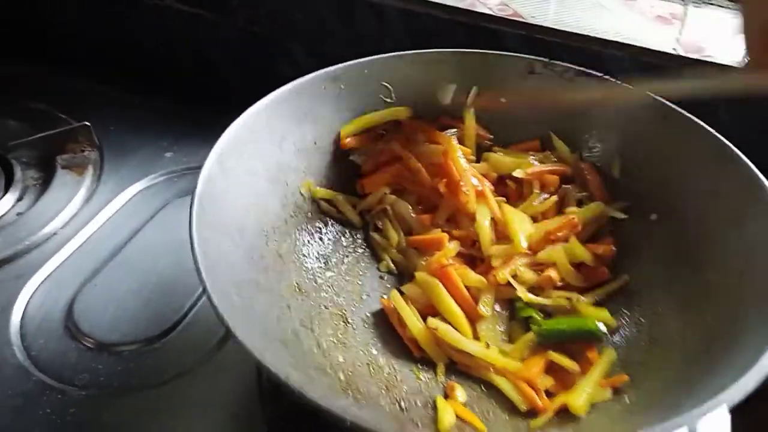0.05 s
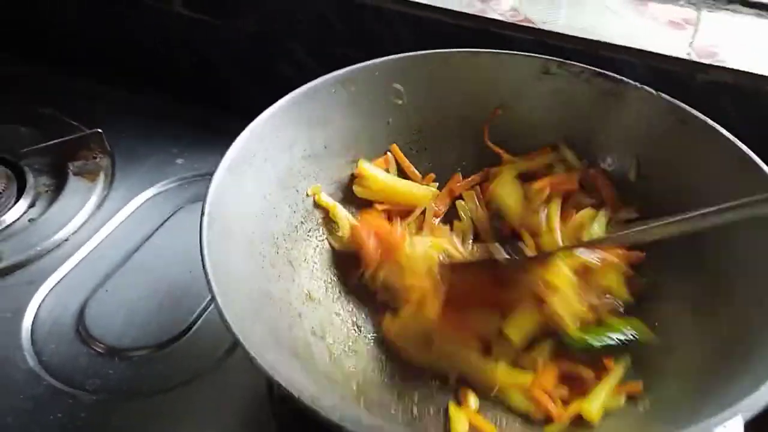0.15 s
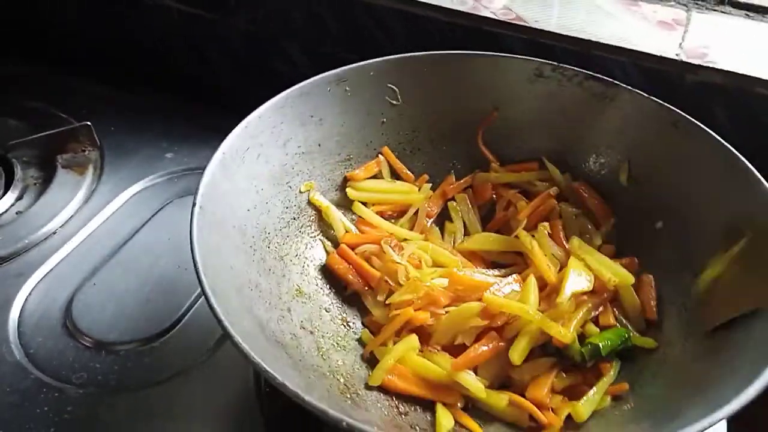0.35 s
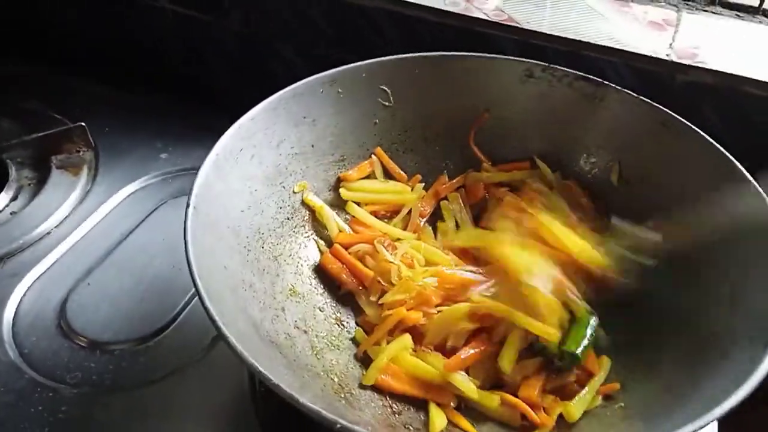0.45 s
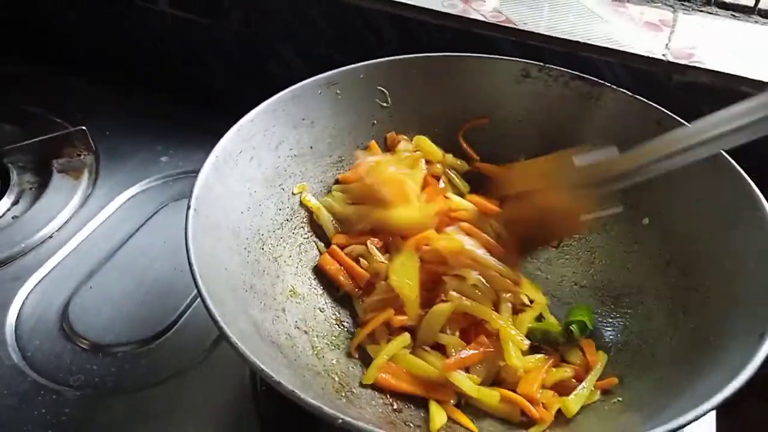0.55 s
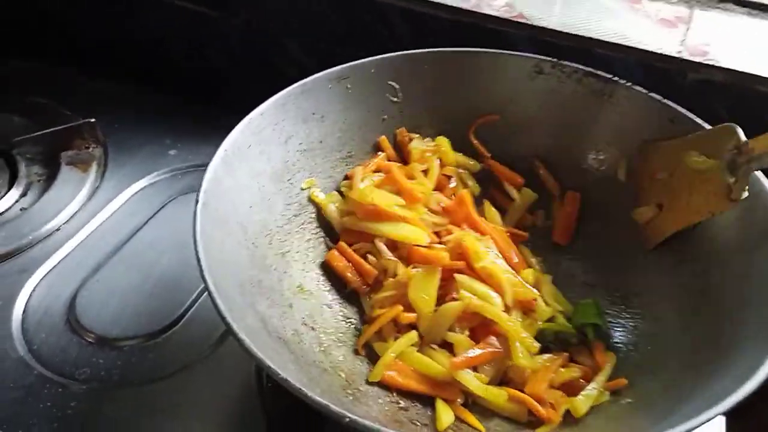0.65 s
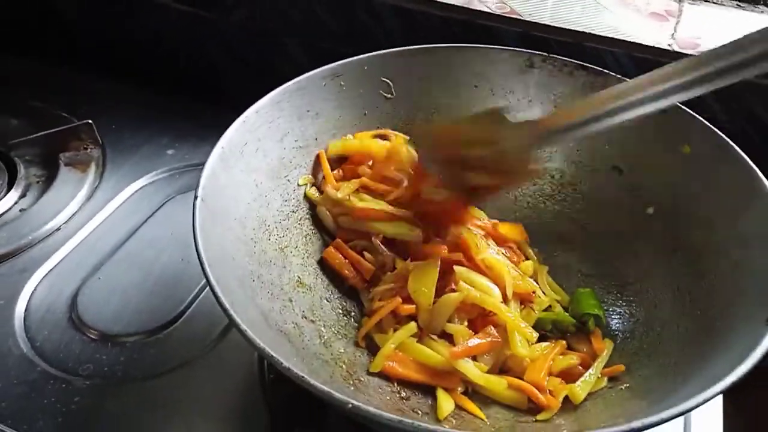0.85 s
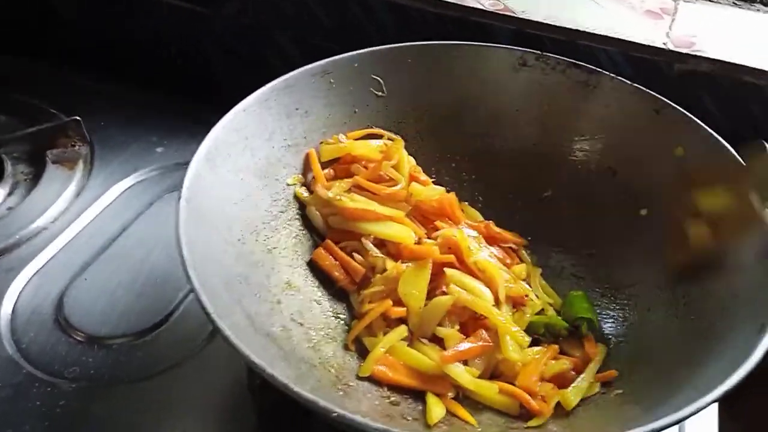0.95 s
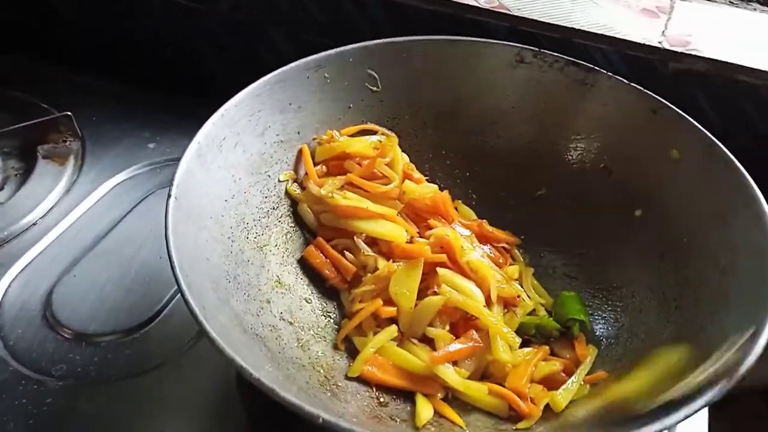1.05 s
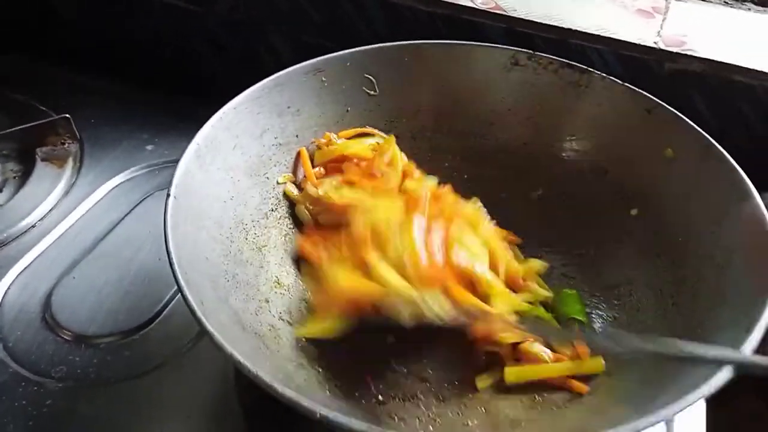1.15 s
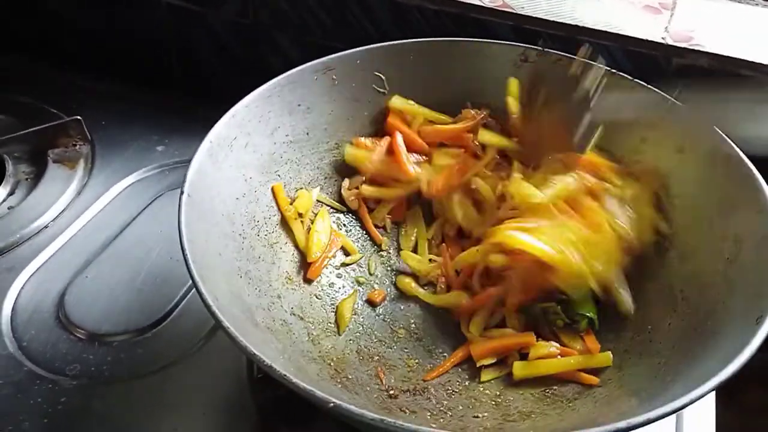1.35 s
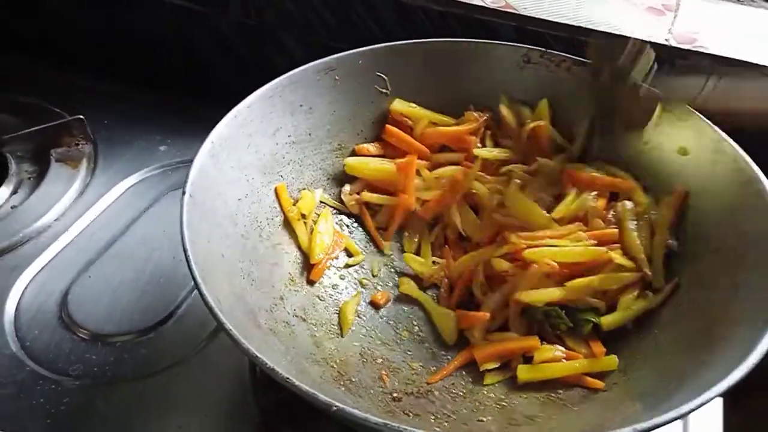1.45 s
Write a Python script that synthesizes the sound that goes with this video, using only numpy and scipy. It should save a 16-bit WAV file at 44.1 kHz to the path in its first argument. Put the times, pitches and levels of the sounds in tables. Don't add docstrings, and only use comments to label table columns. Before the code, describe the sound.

A metal spatula scrapes and knocks in a steel wok of vegetables over a faint sizzle.

```python
import sys
import numpy as np
from scipy import signal
from scipy.fft import rfft, irfft, next_fast_len
from scipy.io import wavfile
from scipy.ndimage import uniform_filter1d, map_coordinates

SR = 44100
rng = np.random.default_rng(int(sys.argv[2]) if len(sys.argv) > 2 else 0)


def attenuation_scalar(level_db):
    decades = np.asarray(level_db, float) / 20
    return 10 ** decades


def int16_out(signal):
    q = np.round(np.clip(np.atleast_2d(signal).T, -1, 1) * 32767)
    wavfile.write(sys.argv[1], SR, q.astype(np.int16))


N = 66150
TIME = np.arange(N) / SR


def unit(x):
    return x / np.sqrt(np.mean(x ** 2) + 1e-20)


def along(points, hz):
    f, v = np.transpose(points)
    return np.interp(np.log(hz + 1), np.log(f + 1), v)


def wobble(rate):
    knots = rng.standard_normal(int(N * rate / SR) + 4)
    return map_coordinates(knots, [np.arange(N) * rate / SR])


def filtered(x, response):
    m = next_fast_len(N + SR // 2)
    return irfft(rfft(x, m) * response(np.fft.rfftfreq(m, 1 / SR)), m)[..., :N]


def coloured(x, spectrum):
    return unit(filtered(x, lambda hz: attenuation_scalar(along(spectrum, hz))))


def resonances(table):
    def response(f):
        total = 0
        for k, (centre, width, db) in enumerate(table):
            damping = 1j * f * width
            total = total + (-1) ** k * attenuation_scalar(db) * damping / (centre ** 2 - f ** 2 + damping)
        return total
    return response


def modes(table, longest=.5):
    def response(f):
        total = 0
        for k, (centre, db, t60) in enumerate(table):
            width = np.log(1000) / np.pi / np.clip(t60, .005, longest)
            gain = (-1) ** k * attenuation_scalar(db) * SR / np.pi
            total = total + gain * 1j * f / (centre ** 2 - f ** 2 + 1j * f * width)
        return total
    return response


def slips():
    return unit(rng.standard_normal(N) * attenuation_scalar(2.5 * wobble(900) + wobble(60.2)))


def swell(s, length):
    u = np.clip((TIME - s) / length, 0, 1)
    return np.abs(np.sin(np.pi * u ** .55)) ** .8


# frequency [Hz], level [dB per Hz].
AIR_SPECTRUM = [(15, -53), (25, -14), (140, -1), (220, 0.5), (482, -1.5), (1020, -9), (1100, -9),
                (2200, -12), (2860, -17), (4840, -120)]


def kitchen_air():
    return attenuation_scalar(-62) * coloured(rng.standard_normal(N), AIR_SPECTRUM) * attenuation_scalar(1.5 * wobble(11.65))


# frequency [Hz], level [dB per Hz].
SIZZLE_SPECTRUM = [(1200, -18), (2700, -3), (4450, -11.5), (6800, -0.5), (7700, -5), (8800, -7.5),
                   (12500, -15.5), (14000, -18.5), (15100, -9)]


def sizzle():
    spits_per_s, spit_db, level_db = 500, -9, -56.5
    spit_level = attenuation_scalar(4 * np.minimum(rng.exponential(size=N), 2))
    spits = (rng.random(N) < spits_per_s / SR) * rng.standard_normal(N) * spit_level
    steam = rng.standard_normal(N) * attenuation_scalar(2.1 * wobble(40.05))
    fry = steam + attenuation_scalar(spit_db) * unit(spits)
    return attenuation_scalar(level_db + wobble(5.23)) * coloured(fry, SIZZLE_SPECTRUM)


# frequency [Hz], t60 [s].
ROOM_DECAY = [(200, .25), (2000, .2), (10000, .12)]


def room(x):
    hz, t, z = signal.stft(rng.standard_normal(SR // 2), SR, nperseg=256)
    decay = attenuation_scalar(-60 * t / along(ROOM_DECAY, hz)[:, None])
    tail = signal.istft(z * decay, SR, nperseg=256)[1]
    delayed = np.pad(x, (200, 0))
    return signal.fftconvolve(delayed, tail / np.linalg.norm(tail))[:N]


# start [s], length [s], pitch [Hz], level [dB], glide [Hz].
SQUEAK_EVENTS = [(0.098, 0.02, 857, -56, -2), (0.119, 0.071, 991, -63, 57.5),
                 (0.135, 0.039, 1750, -64.5, 40.5), (0.105, 0.025, 185, -53.5, 19),
                 (0.136, .025, 230, -58, 1.5), (0.405, 0.065, 840.5, -44.5, -19.5),
                 (0.419, 0.04, 1105, -46, -0.5), (0.447, 0.052, 1127, -49, 30.5),
                 (0.463, 0.018, 1359, -52, 1.5), (1.115, 0.062, 4264, -55, -4),
                 (0.545, 0.059, 800, -55.5, -31), (0.617, 0.086, 1996, -65.5, -0.5),
                 (0.801, 0.029, 4420, -57, 4.5), (0.804, 0.017, 2663, -55.5, 0.5),
                 (1.211, 0.015, 1800, -48, 5), (1.25, 0.16, 2015, -69, -2)]


def squeaks():
    flutter_db, jitter_hz = 2.5, 15
    out = np.zeros(N)
    for s, length, hz, db, glide in SQUEAK_EVENTS:
        level = attenuation_scalar(db + flutter_db * wobble(90)) * swell(s, length) * np.sqrt(2)
        progress = np.clip((TIME - s) / length - .5, -.5, .5)
        pitch = hz + glide * progress + jitter_hz * wobble(120)
        out += level * np.sin(2 * np.pi * np.cumsum(pitch) / SR)
    return out


# start [s], length [s], level [dB], centre [Hz].
SURGE_EVENTS = [(.216, .014, -36, 6600), (.23, .024, -42, 6800), (.281, .018, -39, 5300),
                (.298, .032, -41, 6000), (.338, .015, -39, 6200), (.359, .01, -43, 6900),
                (.212, .016, -38, 2620), (.285, .014, -43, 2620), (.251, .015, -36, 1800),
                (.361, .012, -43, 2800), (1.232, .05, -51, 1900), (1.068, .03, -52, 7000),
                (.848, .055, -55, 600), (1.005, .035, -48, 2600), (1.097, .035, -48, 2200),
                (.29, .04, -47, 155), (.21, .05, -42, 780)]


def surges():
    out = np.zeros(N)
    for s, length, db, centre in SURGE_EVENTS:
        band = lambda f: np.exp(-(np.log(f / centre + 1e-9) / .2) ** 2)
        out += attenuation_scalar(db) * swell(s, length) * unit(filtered(slips(), band))
    return out


# start [s], level [dB], softness [s].
KNOCK_EVENTS = [(.098, -51.5, 0.00052), (0.392, -48, 0.001), (0.404, -39, 0.00055), (1.05, -48, 0.00068),
                (0.2113, -25, 0.00047), (.252, -26.5, 0.00047), (0.257, -26.5, 0.00046),
                (0.278, -41, 0.00044), (0.305, -47, 0.00043), (0.325, -43.5, 0.00024), (.355, -35, 0.00038),
                (0.851, -38.5, 0.0006), (1.152, -34, 0.00052), (1.2345, -31, 0.00045),
                (1.266, -37, 0.00048), (1.005, -36.5, 0.001)]
# frequency [Hz], level [dB], t60 [s].
BOWL_MODES = [(230, -20.5, 0.055), (294.6, -3.5, 0.078), (342.5, -4, 0.055), (505, -8.5, 0.035),
              (612, -12, 0.084), (751, -5.5, 0.047), (1000, -16, 0.032), (1740, -10, 0.03)]


def knocks():
    push, t = np.zeros(N + SR), np.arange(SR // 50) / SR
    for s, db, soft in KNOCK_EVENTS:
        u = t / soft
        rough = 1 + .6 * rng.standard_normal(len(t))
        push[round(s * SR):][:len(t)] += attenuation_scalar(db) * u * np.exp(-u) / (soft * SR) * rough
    return filtered(push[:N], modes(BOWL_MODES))


# start [s], level [dB], click pitch [Hz], click t60 [s], ring level re click [dB].
TAP_EVENTS = [
    (0.69, -29.5, 3080, 0.015, -19),
    (1.001, -25.5, 3160, 0.025, -47),
    (1.1, -38, 11000, 0.0021, -38),
    (1.014, -52, 2876, 0.028, -38),
    (1.477, -39, 3000, 0.0054, -25),
    (0.52, -45, 3550, 0.045, -12),
    (1.1065, -36, 2100, 0.0083, -41),
    (1.117, -37, 7700, 0.004, -13.5),
]
# frequency [Hz], level [dB], t60 [s].
SPATULA_MODES = [(1437, -12, .4), (2020, -22, .5), (2686, -9, .45), (3429, -5, .18), (4264, -15, .3),
                 (7130, -9, .12)]


def taps():
    out, blows, t = np.zeros(N + SR), np.zeros(N), np.arange(SR // 5) / SR
    onset = 1 - np.exp(-t / 0.00028)
    for s, db, hz, t60, ring_db in TAP_EVENTS:
        start = round(s * SR)
        out[start:][:len(t)] += attenuation_scalar(db - 60 * t / t60) * onset * np.sin(2 * np.pi * hz * t)
        blows[start] = attenuation_scalar(db + ring_db)
    return out[:N] + filtered(blows, modes(SPATULA_MODES))


# start [s], rise [s], hold [s], fall t60 [s], level [dB].
SKID_EVENTS = [
    (.412, 0.0028, 0.0055, 0.12, -35.5),
    (0.798, 0.015, 0.0029, 0.13, -43),
    (0.9989, 0.0011, 0.00075, 0.1, -38.5),
    (1.093, 0.0038, 0.02, 0.22, -41.5),
]
# frequency [Hz], level [dB], t60 [s].
SKID_SPOTS = [
    [(4264, -15, .08), (5350, -12, .06), (6148, 0, .06), (7077, -3, .08), (8931, -9, .07), (9500, -11, .05),
     (9805, -5, .045), (14700, -10, .025)],
    [(5250, -6, .04), (5440, -4, .07), (6395, 0, .06), (6880, 0, .04), (7650, -6, .04), (8753, -5, .04),
     (9685, -10, .03)],
    [(4840, -6, .04), (5740, -3, .03), (5943, -4, .05), (6890, -5, .04), (7600, -5, .04), (8931, -1, .04),
     (9577, -2, .04), (10300, -8, .03), (12820, -12, .04), (14640, -7, .02)],
    [(1540, -14, .04), (2150, -8, .04), (2762, -6, .04), (3300, -8, .03), (3740, 0, .03), (4264, -15, .06),
     (6200, -4, .03), (7060, -5, .03), (7400, -5, .03), (10900, -20, .02)],
]
# frequency [Hz], level [dB].
SKID_SPECTRUM = [(1500, -25), (3400, 2.5), (4400, -11), (5600, 6), (7400, 5), (9000, -3.5), (11500, -23),
                 (14500, -8)]


def skids():
    damped_s, hiss_db = .075, -3
    out = np.zeros(N)
    for (s, rise, hold, fall, db), spot in zip(SKID_EVENTS, SKID_SPOTS):
        t = TIME - s
        shape = np.clip(t / rise, 0, 1) ** 0.92 * attenuation_scalar(-60 * np.maximum(t - rise - hold, 0) / fall)
        grain = slips()
        ring = np.zeros(N)
        for mode in spot:
            share = attenuation_scalar(mode[1]) * np.sqrt(mode[2])
            ring += share * unit(filtered(shape * grain, modes([mode], damped_s)))
        ring /= np.std(ring[round(s * SR):][:SR // 20])
        hiss = attenuation_scalar(hiss_db) * shape * coloured(grain, SKID_SPECTRUM)
        out += attenuation_scalar(db) * (0.63 * ring + hiss)
    return out


# frequency [Hz], level [dB per Hz].
RUB_SPECTRUM = [(40, -19), (100, -12), (170, -5.5), (300, -0.5), (500, -5), (800, -5.5), (1800, -9),
                (3500, -16), (6000, -34)]
# frequency [Hz], level [dB per Hz].
BITE_SPECTRUM = [(1300, -13), (2600, -3), (4200, -5), (5200, -3), (7400, -4), (8300, -15.5), (12000, -32),
                 (15000, -23), (16000, -31)]


def drag(stroke, wok):
    rub_db, body_db = -4, -4
    s, press_db, bite_db = np.transpose(stroke)
    press = attenuation_scalar(np.interp(TIME, s, press_db, -150, -150))
    grain = slips()
    bowl = resonances(wok)
    steady = np.std(filtered(grain, bowl))
    body = attenuation_scalar(body_db) * filtered(press * grain, bowl) / steady
    rub = attenuation_scalar(rub_db) * press * coloured(grain, RUB_SPECTRUM)
    bite = press * attenuation_scalar(np.interp(TIME, s, bite_db)) * coloured(slips(), BITE_SPECTRUM)
    return body + rub + bite


# time [s], pressure [dB], edge bite [dB].
STROKE_IN = [(.097, -64, -8), (.102, -61.5, 4.5), (.14, -65, -23), (.17, -57, -7), (.207, -71, 13)]
STROKE_LIFT = [(.405, -58, -10), (.425, -44.5, -11), (.47, -48, -3), (.5, -55, 3.5), (.555, -50, -4.5),
               (.6, -58.5, -1.5), (.66, -75, 13)]
# frequency [Hz], width [Hz], level [dB].
BARE_BOWL = [(304, 160, -10), (780, 60, -2), (836, 79, -0.5), (1005, 92, 1), (1165, 110, 1), (1370, 100, 1),
             (1790, 110, -2.5)]


def bare_strokes():
    return drag(STROKE_IN, BARE_BOWL) + drag(STROKE_LIFT, BARE_BOWL)


# time [s], pressure [dB], edge bite [dB].
STROKE_DIG = [(.2065, -51.5, 8), (.214, -34.5, 5), (0.223, -32.5, -0.5), (.25, -35, -5.5),
              (.272, -34.5, -9.5), (.285, -35, -7), (.32, -33.5, -5.5), (.333, -36.5, -10),
              (.345, -36, -11)]
STROKE_OUT = [(0.345, -37, -2), (.368, -37, -11.5), (.38, -41, -9.5), (0.41, -45, -8), (.44, -78, -16)]
STROKE_UP = [(0.678, -52, -4), (.69, -56.5, -0.5), (.79, -65, 4), (0.901, -56.5, -11)]
STROKE_BACK = [(1.002, -53, 0), (1.05, -56.5, -4), (1.067, -79, 8), (1.102, -62, 10), (1.141, -48, -7.5),
               (1.2, -55, 2), (1.231, -57.5, 3), (1.237, -42.5, -11), (1.313, -68, -6)]
# frequency [Hz], width [Hz], level [dB].
LOADED_BOWL = [(280, 32, 1), (334.6, 69, 3), (477, 64, -2.5), (756.8, 17.6, 7), (1140, 110, -13.5),
               (1500, 13, -4.5), (1772, 93, -9.5), (2602, 52, 0)]


def loaded_strokes():
    return sum(drag(stroke, LOADED_BOWL) for stroke in (STROKE_DIG, STROKE_OUT, STROKE_UP, STROKE_BACK))


def scene():
    contacts = squeaks() + surges() + knocks() + taps() + skids()
    steel = contacts + bare_strokes() + loaded_strokes()
    mid = kitchen_air() + sizzle() + attenuation_scalar(-16) * room(steel) + steel
    return np.array([mid, mid])


def roll_off(x):
    return signal.sosfilt(signal.butter(12, 16990, fs=SR, output="sos"), x)


# frequency [Hz], level [dB per Hz].
HISS_SPECTRUM = [(3000, -30.5), (4800, -16), (7000, -35), (10000, -8.5), (12500, -7.5), (14000, -8),
                 (15700, -14.5)]


def record(dry):
    hiss_db, growth_db, low_cut_hz, top_hz = -72.5, -36.5, 53, 15900
    port_hz, port_width_hz, port_db = 15200, 900, 7
    loudness = np.sqrt(np.abs(uniform_filter1d(dry[0] ** 2, SR // 50)))
    hiss_level = attenuation_scalar(hiss_db) + attenuation_scalar(growth_db) * loudness
    hiss = hiss_level * coloured(rng.standard_normal(N), HISS_SPECTRUM)

    def microphone(hz):
        port = attenuation_scalar(port_db * np.exp(-((hz - port_hz) / port_width_hz) ** 2))
        return port * (1j * hz / (low_cut_hz + 1j * hz)) ** 2

    mix = filtered(dry, microphone) + [hiss, -hiss]
    return roll_off(filtered(mix, lambda hz: hz < top_hz))


dry = scene()
out = record(dry)
int16_out(out)
```